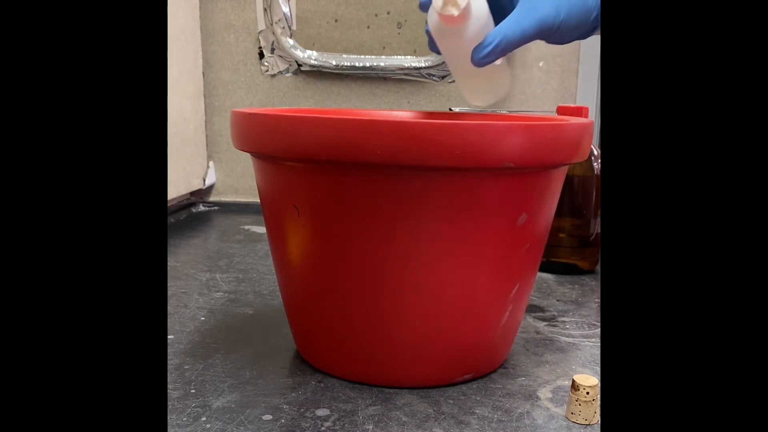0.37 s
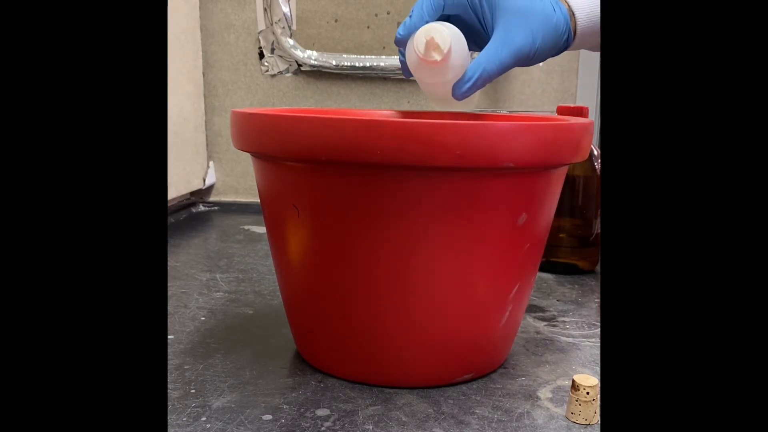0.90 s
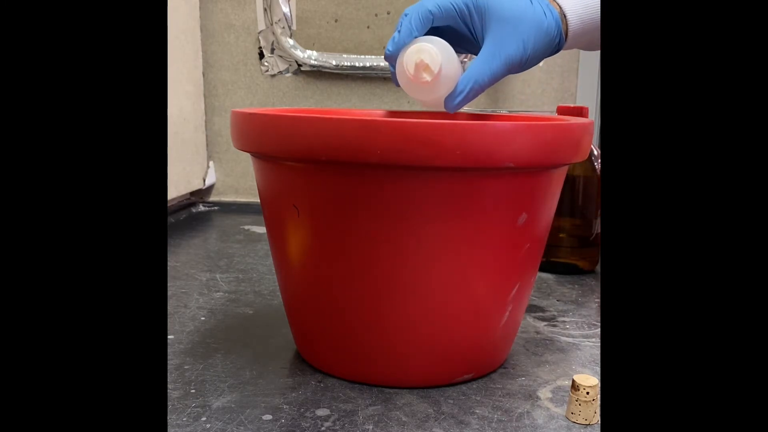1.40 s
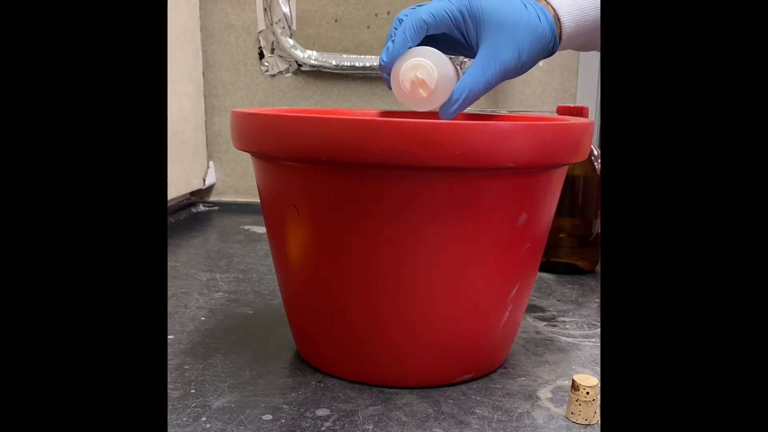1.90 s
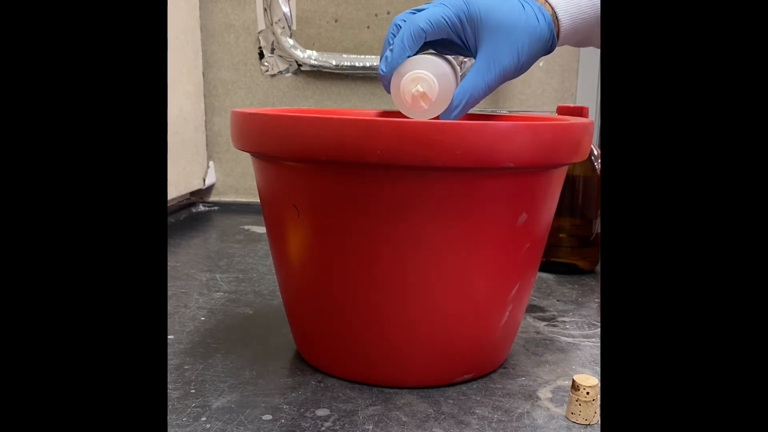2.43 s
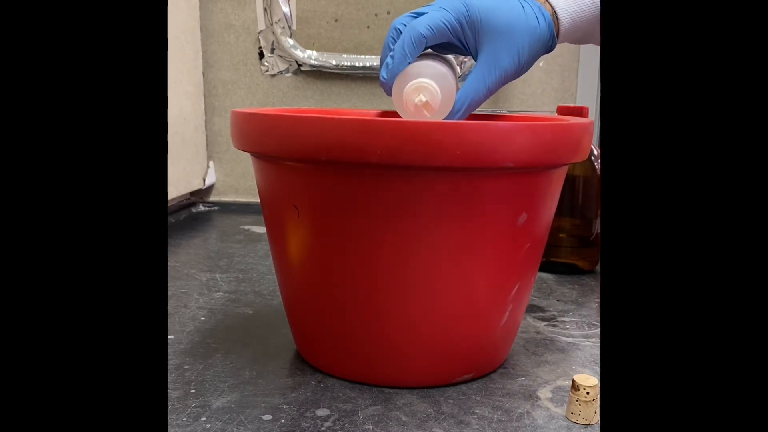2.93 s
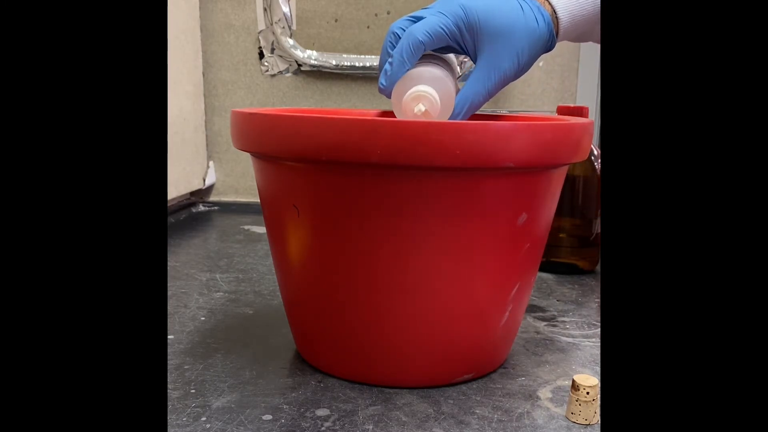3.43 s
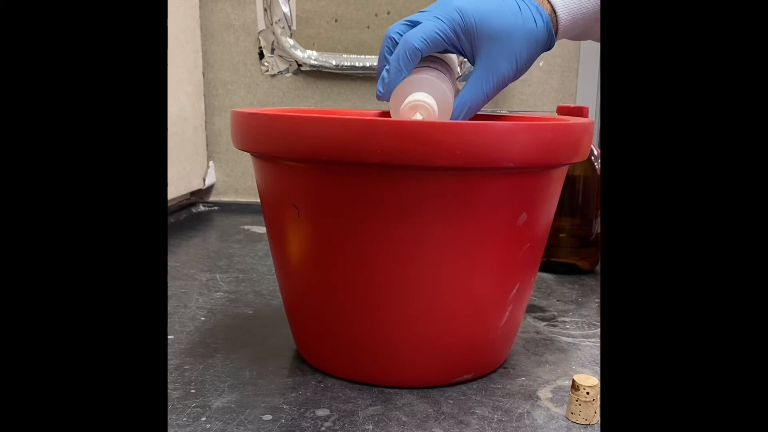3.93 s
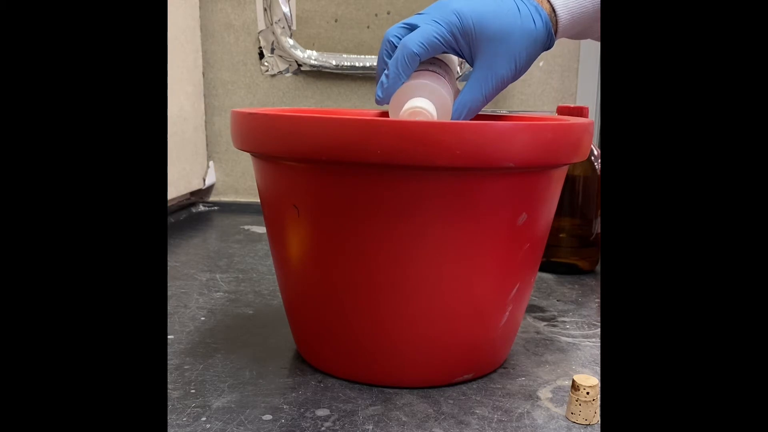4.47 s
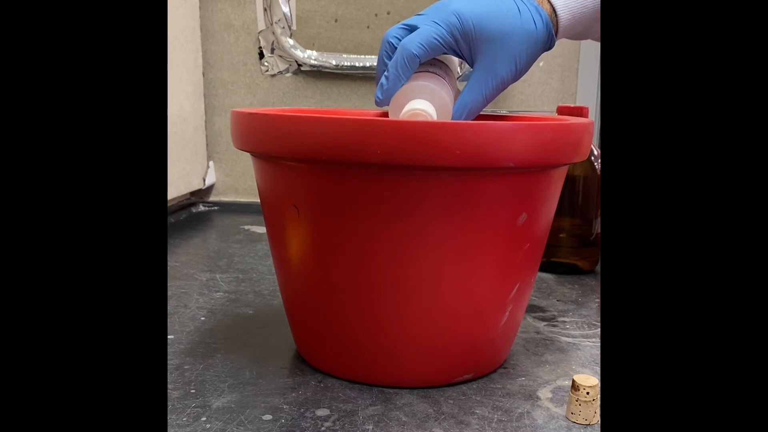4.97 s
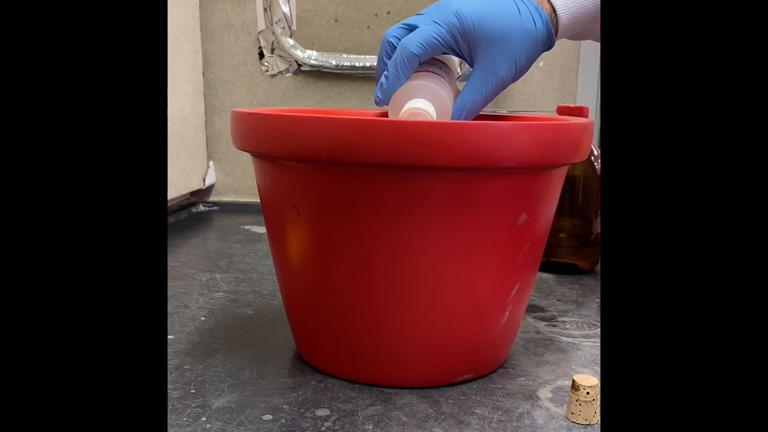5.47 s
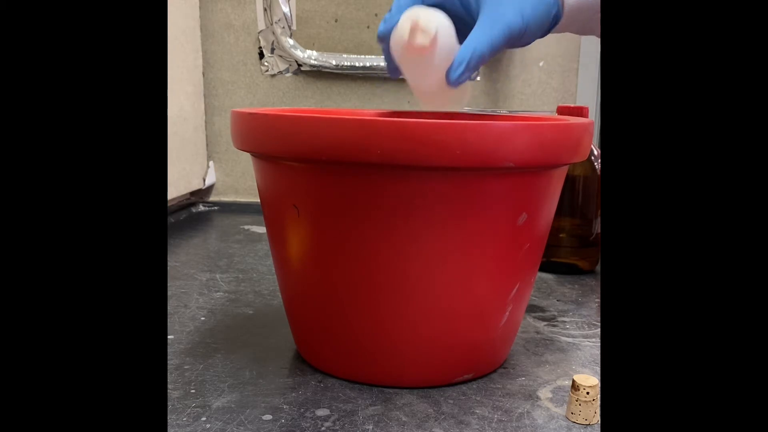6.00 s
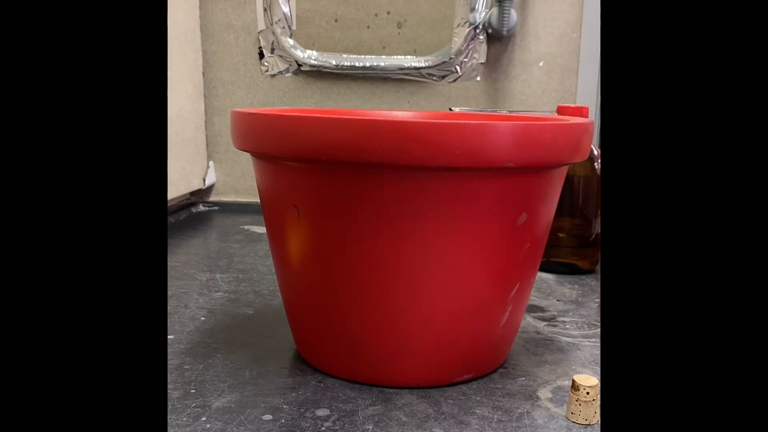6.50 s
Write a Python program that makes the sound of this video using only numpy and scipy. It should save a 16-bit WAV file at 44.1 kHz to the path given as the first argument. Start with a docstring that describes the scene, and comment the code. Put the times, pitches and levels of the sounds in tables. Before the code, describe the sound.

A fume cupboard's ventilation fan drones evenly, its deep bass fluttering under rushing air; a tiny rubbery squeak comes near the end.

```python
"""In a laboratory, by a fume cupboard whose extractor fan runs evenly, a gloved hand moves a bottle nearby.
The fan gives shaft tones from sinusoids and a throbbing duct rumble from resonant noise with swells. Turbulent
air is noise ringing the cupboard's resonances and a broad rush; the slot hisses; the glove rustles faintly in
short noise bursts. Two microphone ports a few centimetres apart hear the bass alike; the left port leads in
the hiss."""
import sys
import numpy as np
from scipy import signal
from scipy.fft import rfft, irfft, next_fast_len
from scipy.io import wavfile
from scipy.ndimage import uniform_filter1d, map_coordinates

SR = 44100
rng = np.random.default_rng(int(sys.argv[2]) if len(sys.argv) > 2 else 0)


def unload_audio(sound):
    """Save the sound as a 16-bit wav file, at the path given as the first command line argument."""
    columns = np.transpose(np.atleast_2d(sound))
    # keep every value between -1 and 1, then stretch to whole-number steps
    steps = np.round(np.clip(columns, -1, 1) * 32767)
    wavfile.write(sys.argv[1], SR, steps.astype(np.int16))


def how_loud(loudness_db):
    """Turn decibels into a plain amplitude multiplier (0 dB gives 1, 20 dB gives 10)."""
    steps = np.asarray(loudness_db, float) / 20
    return 10 ** steps


N = 291942  # samples heard
M = next_fast_len(N + 8192)  # samples synthesized through spectra
HZ = np.fft.rfftfreq(M, 1 / SR)
T = np.arange(N) / SR


def unit(x):
    """Scales a signal to rms 1."""
    return x / np.sqrt(np.mean(x ** 2) + 1e-20)


def along(points):
    """Interpolates every column after the frequency over HZ, on a log axis."""
    hz, *columns = np.transpose(points)
    return [np.interp(np.log(HZ + 1), np.log(hz), column) for column in columns]


def wobble(rate):
    """A smooth random curve with rate knots a second."""
    knots = rng.standard_normal(int(N * rate / SR) + 4)
    return map_coordinates(knots, [T * rate])


def bell(centre_s, length_s):
    """A smooth rise and fall; its length is two standard deviations."""
    return np.exp(-0.5 * ((T - centre_s) / (length_s / 2)) ** 2)


def noise(size=len(HZ)):
    """Spectrum of white noise at 0 dB per Hz."""
    return np.sqrt(M * SR / 4) * (rng.standard_normal(size) + 1j * rng.standard_normal(size))


def heard(spectrum):
    """Turns a spectrum into the N samples heard."""
    return irfft(spectrum, M)[..., :N]


def peak(f, hz, width):
    """A resonance applied twice: steep flanks, dark valleys."""
    return (1j * f * width / (hz ** 2 - f ** 2 + 1j * f * width)) ** 2


def ports(spectrum, pan_db, lead):
    """One source at both ports: level and phase differences split half to each side."""
    half = how_loud(pan_db / 2) * np.exp(0.5j * lead)
    return np.array([spectrum * half, spectrum / half])


def spread(own_db, lead):
    """Stereo noise: a shared part with a left phase lead, plus a part of each port's own."""
    own = np.clip(how_loud(own_db), 0, 1)
    shared = ports(noise(), 0, lead)
    return np.sqrt(1 - own ** 2) * shared + own * np.array([noise(), noise()])


def evened(x, size):
    """Noise of about rms 1 with its own swells, slower than size samples, taken out."""
    power = uniform_filter1d(unit(x) ** 2, size=size)
    power = uniform_filter1d(power, size=size)
    return unit(x / np.sqrt(np.abs(power) + 0.039))


def patchy(x, depth_db):
    """Eddies: random gain in patches of a few hundred Hz by a few tens of ms."""
    z = signal.stft(x, nperseg=512)[2]
    field = uniform_filter1d(rng.standard_normal(z.shape[1:]), size=7, axis=0)
    field = uniform_filter1d(field, size=10, axis=1)
    return signal.istft(z * how_loud(depth_db * unit(field)), nperseg=512)[1][:, :N]


# phase by which sound from one side reaches the left port first: (hz, lead_cycles)
SIDE_LEAD = [(4400, 0), (7450, .5), (10650, 1), (13550, 1.5), (16100, 2)]


def port_lead():
    """Sound from one side reaches the left port earlier: its phase lead in radians grows with frequency."""
    return 2 * np.pi * np.interp(HZ, *np.transpose(SIDE_LEAD))


# glove on bottle, rms level at the height of each stroke: (centre_s, length_s, level_db, pitch_hz, width_hz)
GLOVE_STROKES = [ (.45, .11, -63, 10000, 6000), (2.17, .05, -70, 9000, 6000), (4.779, .022, -51, 4830, 200),
                 (4.774, .016, -55.5, 5370, 200), (5.89, .07, -65, 10100, 900),
                 (6.235, .045, -59.5, 10000, 6000), (6.19, .05, -53.5, 3000, 900)]


def glove():
    """Short rubs and squeaks: a steady band of noise under a bell-shaped stroke."""
    strokes = 0
    for centre_s, length_s, level_db, hz, width in GLOVE_STROKES:
        rub = evened(heard(peak(HZ, hz, width) * spread(-15, port_lead())), size=200)
        strokes = strokes + how_loud(level_db) * rub * bell(centre_s, length_s)
    return strokes


# slot hiss before its bass is cut: (hz, level_db per Hz)
SLOT_SPECTRUM = [(4500, -88), (5800, -89), (6500, -96), (8000, -94.5), (10000, -100), (12000, -102),
                 (14000, -106), (15500, -110)]
# slow course of the hiss about that spectrum: (time_s, level_db)
SLOT_COURSE = [(0, -0.5), (.9, -0.5), (1.5, -1.5), (2.1, -0.5), (3, -1.5), (4.5, -1.5), (5.6, -1.5),
               (6.62, 1)]


def slot():
    """Fine hiss of air through the slot, off to one side: noise cut steeply below 5500 Hz."""
    low_cut = 1 / np.hypot(1, (5500 / (HZ + 1)) ** 8)
    hiss = heard(how_loud(along(SLOT_SPECTRUM)[0]) * spread(-16.5, port_lead()) * low_cut)
    level_db = np.interp(T, *np.transpose(SLOT_COURSE))
    return hiss * how_loud(level_db + 0.4 * wobble(9.8))


# airflow before its treble is cut; own_db is each port's own part:
# (hz, level_db per Hz, own_db, left_lead_rad)
AIR_SPECTRUM = [(20, -80, -60, 1), (45, -60.5, -60, -0.5), (91, -56, -44, 0), (173, -62, -19, -0.12),
                (250, -70, -13, 0.046), (490, -70, -0.5, 0.4), (710, -77, -1, 0.5), (960, -75, 1, -2),
                (1390, -79.5, -2, 0), (1705, -85.5, -5, -1), (2400, -83, -2.5, 1.05),
                (3620, -86, -4.5, 0.1), (5300, -90, -2, 0.15), (6000, -95, -16, 2.2)]


def airflow():
    """Broad turbulent rush between the resonances, cut steeply above 5700 Hz and breathing a little."""
    level_db, own_db, lead = along(AIR_SPECTRUM)
    high_cut = 1 / np.hypot(1, (HZ / 5700) ** 8)
    rush = heard(how_loud(level_db) * spread(own_db, lead) * high_cut)
    return patchy(rush, depth_db=1.04) * how_loud(0.24 * wobble(5.2))


# cupboard resonances, level at the peak, pan_db left over right before the ports merge in the bass:
# (pitch_hz, width_hz, level_db per Hz, pan_db, left_lead_rad)
CUPBOARD_MODES = [(184, 19.5, -56, -0.5, 0), (204.3, 13.5, -67, 5, 0.5), (234.4, 11.5, -61.5, 0, 0),
                  (270.9, 17.3, -60.5, -2, 0), (288.9, 17, -58, 2.5, -0.1), (331.6, 14, -76, -1, 0.2),
                  (361.3, 20, -59.5, -1.5, -0.2), (384.6, 15.3, -61, 1.5, -1), (410.9, 14.2, -61, -4, -0.1),
                  (437.2, 22, -61.5, -2, -0.7), (514.3, 30.5, -65.5, -3.5, 1.06),
                  (533.8, 34, -62.5, 0.5, 0.04), (575.4, 28, -70.5, 2, 0), (645, 23, -62.5, 7, 0.63),
                  (670, 18, -73, 4, -4), (748, 38, -71.5, 5.5, -0.1), (772.5, 36, -71.5, 6, -3),
                  (829.7, 27, -70.5, 4, 0), (862.3, 39, -70, 7, -1.5), (983, 84, -72.5, 6, -1.65),
                  (1067, 66, -70.5, 9.5, -0.2), (1175, 41, -76, 8, -1.5), (1494, 89, -82.5, 5, -0.4),
                  (1892, 68, -84, 1, -2), (2033, 55, -84.5, 2, -0.7), (2193, 72, -82.5, 3, -1),
                  (2768, 110, -82.5, -1, 1.1), (3134, 300, -83.5, -5, 1.6), (4330, 350, -89, 1, 2)]


def cupboard():
    """Turbulence keeps each resonance ringing on its own, each from its own direction."""
    f = HZ[HZ < 7000]
    spectrum = 0
    for hz, width, level_db, pan_db, lead in CUPBOARD_MODES:
        ringing = how_loud(level_db) * peak(f, hz, width) * noise(size=len(f))
        spectrum = spectrum + ports(ringing, pan_db, lead)
    return patchy(heard(spectrum), depth_db=0.33)


def boom(modes):
    """Turbulence rings the duct's modes: noise through resonances."""
    return heard(sum(how_loud(level_db) * peak(HZ, hz, width) * noise() for hz, width, level_db in modes))


def played(modes, steady_db, swells, size):
    """A freely wavering boom at a steady rms level, with the loud swells on top."""
    strength = sum(how_loud(level_db) * bell(centre_s, length_s) for centre_s, length_s, level_db in swells)
    return how_loud(steady_db) * unit(boom(modes)) + strength * evened(boom(modes), size)


# lower and upper duct modes, levels relative to each other within a table: (pitch_hz, width_hz, level_db)
DUCT_LOW_MODES = [(54.4, 9.2, -4.5), (67.3, 10.1, 3)]
DUCT_UPPER_MODES = [(123.2, 26.7, -0.5), (147.1, 26.6, 0)]
# loudest swells of the lower and upper modes, rms level at the height: (centre_s, length_s, level_db)
DUCT_LOW_SWELLS = [(0.104, 0.41, -32), (0.804, 0.14, -27.5), (1.08, 0.039, -28), (1.355, 0.065, -24.5),
                   (1.56, 0.054, -26.5), (1.69, 0.073, -26), (1.965, 0.041, -25), (2.153, .08, -29),
                   (2.42, .07, -31), (2.577, 0.034, -26.5), (2.853, 0.084, -27), (2.956, 0.034, -25.5),
                   (3.06, 0.04, -26.5), (3.454, 0.46, -29), (4.16, .07, -28), (4.43, .14, -27),
                   (4.99, .08, -26), (5.425, 0.12, -27.5), (5.768, .04, -30), (5.918, 0.064, -25.5),
                   (6.15, .1, -27), (6.557, 0.11, -28)]
DUCT_UPPER_SWELLS = [(0.555, 0.076, -28), (.75, .07, -31.5), (2.295, 0.067, -31), (2.8, 0.11, -32),
                     (3.082, 0.073, -31), (3.593, 0.12, -33), (4.222, .07, -34.5), (4.887, 0.092, -32.5),
                     (5.342, .08, -32), (5.56, 0.11, -35.5)]


def rumble():
    """The long duct booms alike at both ports, throbbing as its modes swell."""
    low = played(DUCT_LOW_MODES, -35, DUCT_LOW_SWELLS, size=1000)
    upper = played(DUCT_UPPER_MODES, -36, DUCT_UPPER_SWELLS, size=5000)
    return low + upper


# shaft tones, mean rms level, pan_db left over right before the ports merge in the bass:
# (order in multiples of the shaft speed, level_db, pan_db)
SHAFT_ORDERS = [(2, -39, 0), (3, -47.5, -1), (4, -42, -0.5), (5, -49, -0.5), (6, -47.5, 0), (7, -41, 1.5),
                (8, -58.5, -3), (10, -49.5, 0.5)]
# a second motor's tones, the upper three about one shaft turn apart: (pitch_hz, level_db, pan_db)
MOTOR_TONES = [(96.1, -51, 0), (192.1, -48, 1), (222.1, -51, -1), (252.2, -61, -1)]


def tones():
    """Shaft orders share a slightly unsteady speed, the motor's pitches hold; each tone wavers in strength."""
    shaft_hz = 29.98 * (1 + 0.00065 * wobble(1.62))
    turns = np.cumsum(shaft_hz) / SR
    lines = [(order * turns, level_db, pan_db) for order, level_db, pan_db in SHAFT_ORDERS]
    lines += [(hz * T, level_db, pan_db) for hz, level_db, pan_db in MOTOR_TONES]
    total = 0
    for cycles, level_db, pan_db in lines:
        strength = np.sqrt(2) * how_loud(level_db + 1.43 * wobble(2.5))
        tone = strength * np.cos(2 * np.pi * (cycles + rng.random()))
        total = total + tone * how_loud(np.array([[pan_db / 2], [-pan_db / 2]]))
    return total


def scene():
    """All sources at the two ports."""
    return glove() + slot() + airflow() + cupboard() + rumble() + tones()


def top_cut(x):
    """Nothing passes above the cut-off."""
    return signal.sosfilt(signal.butter(12, 17040, fs=SR, output="sos"), x)


def record(dry):
    """Close ports differ ever less toward the bass; nothing is kept from 15750 Hz up."""
    left, right = rfft(dry, M) * (HZ < 15750)
    mid = (left + right) / 2
    side = (left - right) / 2 / np.hypot(1, (90 / (HZ + 1)) ** 3)
    mix = heard([mid + side, mid - side])
    return top_cut(mix)


dry = scene()
out = record(dry)
unload_audio(out)
```